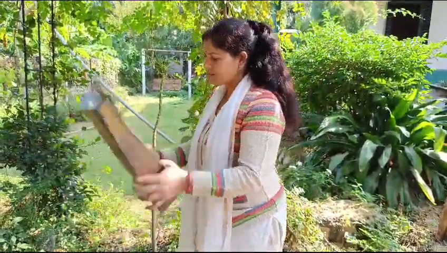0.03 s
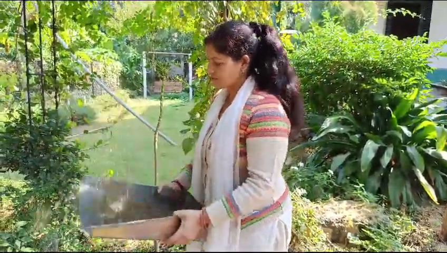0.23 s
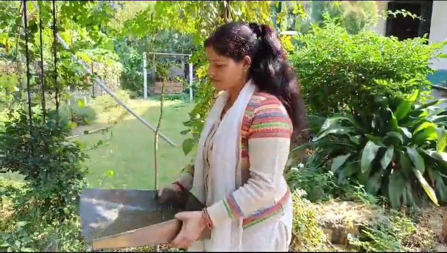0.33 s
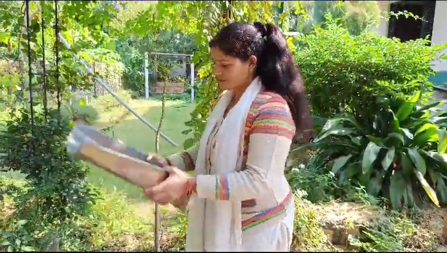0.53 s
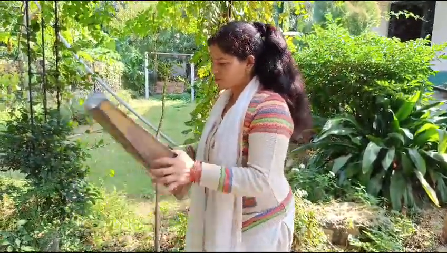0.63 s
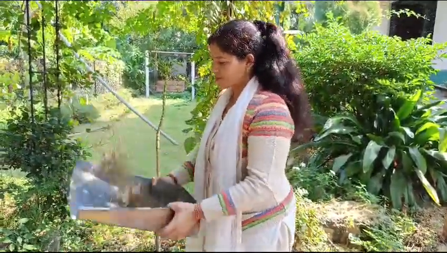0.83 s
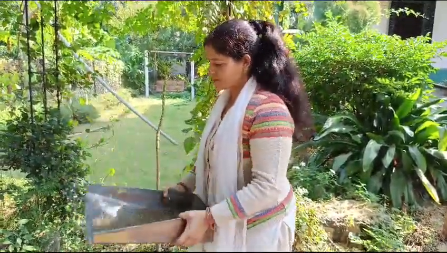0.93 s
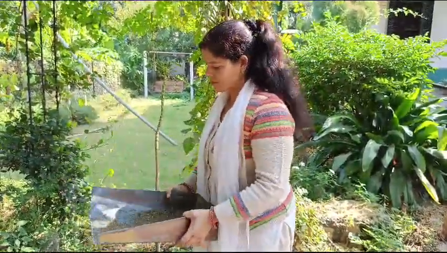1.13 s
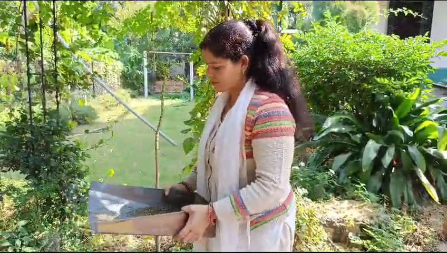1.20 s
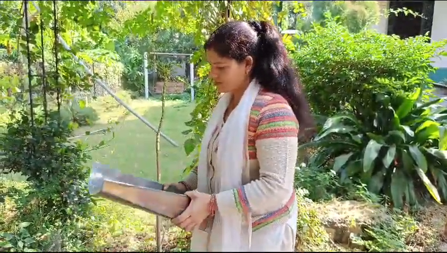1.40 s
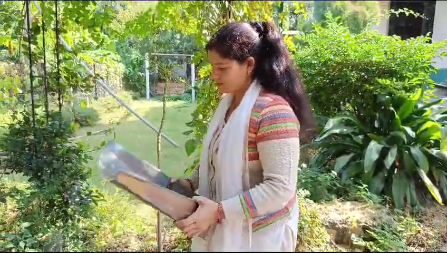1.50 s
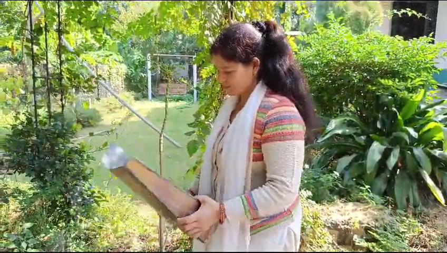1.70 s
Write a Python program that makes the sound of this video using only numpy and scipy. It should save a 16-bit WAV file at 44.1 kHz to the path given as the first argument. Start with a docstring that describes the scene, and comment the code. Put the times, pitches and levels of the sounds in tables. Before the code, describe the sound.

Two tosses of grain thump and shower onto a sheet-metal tray in a quiet garden.

```python
"""Grain is winnowed on a sheet-metal tray, tossed twice in a quiet garden.
Each time the bulk of the grain thumps the tray and sets it ringing, then the rest showers down in a swish.
Between tosses the grain slides softly and single kernels tick.
Behind it sit a low outdoor rumble and hum, a faint thin tone and a few far chirps."""
import sys
import numpy as np
from scipy import signal
from scipy.fft import rfft, irfft
from scipy.io import wavfile
from scipy.ndimage import uniform_filter1d

SR = 44100
rng = np.random.default_rng(int(sys.argv[2]) if len(sys.argv) > 2 else 0)


def master_out(mix):
    """Clip the mix to full scale and print it as 16-bit PCM to the path in sys.argv[1]."""
    frames = np.transpose(np.atleast_2d(mix))
    ceiling = np.clip(frames, -1, 1)
    pcm = np.round(ceiling * 32767).astype(np.int16)
    wavfile.write(sys.argv[1], SR, pcm)


N = 77175

# The tray's modes. Each row: pitch in Hz, dB when hit at the back, dB when hit mid-tray, t60 in seconds.
TRAY_MODES = [(222, -44, -43, .3), (251, -34.5, -25, .38), (360, -26.5, -30, .4), (381, -27.5, -44, .32),
              (418, -30, -37.5, .6), (484, -24.5, -38, .32), (515, -29.5, -41, .85), (535, -33, -42, .5),
              (554, -37, -30, .35), (576, -37, -37.5, .5), (662, -52, -38, .27), (714, -39, -34, .28),
              (748, -48, -38, .29), (787, -45, -24.5, .22), (845, -41, -29, .22), (898, -42, -28.5, .7),
              (934, -43, -38, .3), (981, -40, -27, .23), (1060, -21, -25.5, .23), (1105, -33, -33, .2),
              (1170, -39, -40, .22), (1522, -55, -36, .2), (2092, -38, -40, .16), (2280, -45, -43, .17)]
# The sheet's dense, short rattle. Each row: frequency in Hz, level in dB.
CLATTER_COLOUR = [(60, -28), (150, -14), (235, 4.5), (295, -8.5), (370, -4.5), (510, 6.5), (620, -19.5),
                  (800, -1), (1100, 6), (1320, -10), (1600, -2.5), (1830, -12.5), (2130, -5), (2700, -22),
                  (3700, -24), (4600, -38), (7000, -29), (16000, -105)]
# The bulk lands. Each row: start in seconds, ring in dB, place (0 back, 1 middle), attack in seconds,
# clatter in dB, push in dB, seconds until the piled grain chokes the ring.
LANDING_HITS = [(0.2066, -1, 0, 0.0039, -27.5, -54, 0.16), (.886, 0.5, 0.99, 0.0024, -25, -31, 0.12)]


def thump(start, ring_db, place, attack_s, clatter_db, push_db, choke_s):
    """The bulk lands: a dull push, a short clatter of the sheet, and modes that ring by where it falls."""
    push_hz, push_s = 242.4, 0.024
    hold_s, drop_s, tail_db, tail_t60 = 0.0087, 0.0035, -1.5, 0.31
    t = since(start)
    ring = sum(amp(back + (middle - back) * place - 60 * t / t60)
               * np.sin(2 * np.pi * (hz * t + rng.random())) for hz, back, middle, t60 in TRAY_MODES)
    choke = np.exp(-(t / choke_s) ** 7.4)  # piled grain stops the ring abruptly
    crash = np.exp(-np.maximum(t - attack_s - hold_s, 0) / drop_s)
    tail = amp(tail_db - 60 * t / tail_t60)
    clatter = amp(clatter_db) * np.maximum(crash, tail) * noise(eq(CLATTER_COLOUR))
    push = amp(push_db) * arch(t, push_s) * np.sin(2 * np.pi * push_hz * t)
    return np.minimum(t / attack_s, 1) * (amp(ring_db) * ring * choke + clatter) + push


# Small clumps around each landing. Each row: start in seconds, level in dB, rattle centre in Hz.
CLUMP_HITS = [(0.197, -39.5, 790), (0.2157, -23, 473), (0.855, -30, 1270), (0.868, -28, 1230),
              (.878, -29, 406), (0.908, -26.5, 1080), (1.010, -35.5, 440)]


def clump(start, db, hz, attack_s=0.004, t60=0.067):
    """A light clump rattles the sheet, higher or lower by where it falls."""
    t = since(start)
    rattle = noise(eq(CLATTER_COLOUR) * band(hz, octaves=0.88))
    return np.minimum(t / attack_s, 1) * amp(db - 60 * t / t60) * rattle


# One swish per toss. Each row: time in seconds, level in dB, treble lift in dB.
SHOWER_CURVES = [
    [(.22, -66, -16), (.246, -60.5, -18), (.27, -51, -0.5), (.31, -43, -2), (.39, -42.5, -1), (.45, -44, 2),
     (.5, -48, -2.5), (.56, -59, 2.5), (.63, -76, 6)],
    [(.9, -49.5, -33), (.93, -52, -2.5), (.965, -48.5, -1), (.995, -42.5, -4), (1.04, -46.5, -1),
     (1.105, -44, 2.5), (1.135, -46, 0), (1.165, -55.5, 2), (1.22, -66, 5), (1.3, -84.5, 9)],
]
# The tone of raining grain. Each row: frequency in Hz, level in dB.
SWISH_COLOUR = [(180, -28), (330, -39), (400, -19), (520, -2), (650, -15), (800, -7.5), (1020, -2.5),
                (1180, -2.5), (1300, -8), (1550, -4.5), (2050, -4.5), (2400, -7), (2590, -10.5), (2820, -9),
                (3920, -6), (4550, -10), (5300, -8), (7300, -10), (8200, -16), (10300, -13), (15800, -14.5)]
# Ringing under the rain. Each row: pitch in Hz, width in Hz, dB in the first toss, dB in the second.
SHOWER_RESONANCES = [(885, 9.8, -12, -12), (1013, 44, -11, -20), (1750, 9.4, -21.5, -25),
                     (1905, 6.9, -6, -5), (2036, 32, -10, -11.5), (2322, 67, -10.5, -14),
                     (2787, 72, -15.5, -12.5)]


def shower(curve, toss):
    """Kernels rain on the tray, brighter as grain lands on grain, and keep a few resonances singing."""
    times, db, lift_db = np.transpose(curve)
    hits = kernels(per_s=12000, spread_db=2.5)
    hiss = amp(7.5) * coloured(hits, eq(SWISH_COLOUR))
    body = lowpass(hiss, hz=7040)
    treble = (hiss - body) * amp(np.interp(since(0), times, lift_db))
    rings = sum(amp(ring_db[toss]) * coloured(hits, resonance(hz, width))
                for hz, width, *ring_db in SHOWER_RESONANCES)
    return (body + treble + rings) * fader(np.transpose([times, db]))


# Three slides as the tray swings. Each row: time in seconds, level in dB.
SLIDE_CURVES = [
    [(0.0, -64), (0.026, -74), (0.082, -58.5), (0.13, -62), (0.22, -58.5), (0.246, -80), (0.26, -49)],
    [(0.62, -64), (0.656, -75), (0.7, -59.5), (0.746, -53.5), (0.804, -60.5), (0.872, -58), (0.92, -76)],
    [(1.3, -88), (1.364, -65), (1.376, -56.5), (1.54, -62), (1.6, -57.5), (1.704, -64.5), (1.75, -61.5)],
]
# The fizz of sliding grain. Each row: frequency in Hz, level in dB.
FIZZ_COLOUR = [(880, -56), (1500, 2), (1720, -28.5), (1810, -23), (2550, -19), (3640, -2.5), (4480, 0.5),
               (7040, 4.5), (8490, -4), (15800, 1.5)]


def slide(skid_s=0.024, skid_db=2):
    """Kernels move over the swinging tray in small uneven skids, making a fine fizz."""
    fizz = amp(1.06) * coloured(kernels(per_s=2200, spread_db=3), eq(FIZZ_COLOUR))
    window = round(skid_s * SR)
    drift = uniform_filter1d(uniform_filter1d(rng.standard_normal(N), window), window)
    skids = amp(skid_db * unit(drift))
    return fizz * skids * sum(fader(curve) for curve in SLIDE_CURVES)


# The rustle's rise and fall. Each row: time in seconds, level in dB.
RUSTLE_CURVE = [(0, -65), (.11, -61), (.16, -55), (.22, -50.5), (.6, -62), (.79, -59), (.85, -48.5),
                (1.18, -55.5), (1.3, -67.5), (1.55, -62.5), (1.65, -59.5), (1.75, -58.5)]
# Its dull tone. Each row: frequency in Hz, level in dB.
RUSTLE_EQ = [(150, 0), (480, 4.5), (700, -1), (1000, 0.5), (1350, -1), (2000, -3), (2700, -8), (5000, -15)]
# The sheet's faint song. Each row: pitch in Hz, width in Hz, level in dB.
SHEET_RESONANCES = [(2023, 99, -13)]


def rustle():
    """The moving tray rustles, and the sheet sings faintly under the sliding grain."""
    rub = noise(eq(RUSTLE_EQ))
    rings = sum(amp(db) * noise(resonance(hz, width)) for hz, width, db in SHEET_RESONANCES)
    return (rub + rings) * fader(RUSTLE_CURVE)


# Single kernels. Each row: start in seconds, level in dB, pitch in Hz, t60 in seconds.
KERNEL_TICKS = [(0.715, -47.5, 9500, 0.01), (0.727, -50, 7000, .01), (0.866, -44, 7000, 0.016),
                (1.337, -57.5, 6700, 0.011), (1.3782, -48, 7700, 0.011), (1.4554, -49, 5600, 0.026),
                (1.458, -51, 2200, 0.022), (1.4597, -46.5, 4300, 0.018), (1.534, -55, 15000, 0.009),
                (1.558, -48, 8900, 0.015), (1.583, -52, 11500, 0.01), (1.658, -51, 7000, 0.009)]


def tick(start, db, hz, t60):
    """One stray kernel strikes: a tiny burst of pitched noise."""
    t = since(start)
    return (t > 0) * amp(db - 60 * t / t60) * noise(band(hz, octaves=0.38))


# The tray's stereo balance. Each row: frequency in Hz, left minus right in dB.
TRAY_BALANCE = [(60, 1.5), (500, -2.5), (860, 2), (1200, -3.5), (1580, 5), (2080, -9.5), (2750, 2),
                (3300, -6.5), (4500, -2.5), (7500, 2), (12500, -7.5), (16000, -14)]
# Its earlier arrival on the left. Each row: frequency in Hz, phase lead in radians.
LEFT_LEAD = [(20, -1), (550, 0.24), (1050, 1.5), (1400, 2.5), (1800, 1.5), (2200, 5.5), (2750, 5.5),
             (3600, 10), (16000, 48.5)]


def place_tray(x):
    """The tray lies to the left, so each side hears it with a different delay and colour."""
    half = amp(across_bins(TRAY_BALANCE) / 2)
    pair = np.array([half, np.exp(-1j * across_bins(LEFT_LEAD)) / half])
    pair_rms = np.sqrt(np.mean(abs(pair) ** 2, axis=0))
    return irfft(rfft(x) * pair / pair_rms, N)


# The outdoor bed. Each row: frequency in Hz, level in dB.
AIR_COLOUR = [(20, -9), (40, -5.5), (58, 1), (85, -11), (125, -14.5), (200, -17), (450, -27), (800, -30.5),
              (1500, -51), (3500, -41), (8000, -44), (16000, -57)]
# The rumble's swell. Each row: time in seconds, gain in dB.
RUMBLE_SWELL = [(0, -4.5), (.25, -2.5), (.41, 7), (.6, 0), (.73, 2.5), (1.0, 0.5), (1.15, 3.5), (1.33, -4),
                (1.55, -1), (1.68, 3.5)]


def garden_air():
    """Soft outdoor air with a wavering low hum; the low end swells and sinks."""
    hum = amp(-55.5) * noise(resonance(hz=58.7, width=19))
    air = amp(-52.5) * noise(eq(AIR_COLOUR)) + hum
    rumble = lowpass(air, hz=138)
    swell = amp(np.interp(since(0), *np.transpose(RUMBLE_SWELL)))
    return air - rumble + rumble * swell


# Chirps far off in the garden. Each row: start in seconds, length in seconds, pitch in Hz, level in dB.
FAR_CHIRPS = [(1.557, 0.0075, 3650, -57), (1.588, 0.009, 3640, -61), (1.603, .022, 3600, -67),
              (1.715, 0.033, 3280, -65)]
# A thin tone between the tosses. Each row: time in seconds, level in dB.
THIN_TONE_CURVE = [(.57, -79), (.62, -63.5), (.69, -78), (.745, -64), (.82, -72)]


def faint_tones():
    """A few tiny far chirps and one thin tone, all wavering in pitch."""
    chirps = sum(amp(db) * arch(since(start), length) * whistle(hz, waver=0.025)
                 for start, length, hz, db in FAR_CHIRPS)
    return chirps + fader(THIN_TONE_CURVE) * whistle(hz=1690, waver=0.0044)


# The stereo width of every noise. Each row: frequency in Hz, left-right likeness from 0 to 1.
STEREO_LIKENESS = [(25, 0.73), (60, 0.87), (120, 0.6), (400, 0.59), (700, 0.54), (1100, 0.71), (2200, 0.16),
                   (3500, 0.18), (8000, 0.034), (16000, 0.69)]


def coloured(pair, gain):
    """Two unrelated signals, filtered and made partly alike, at rms 1."""
    left, other = rfft(pair)
    same = across_bins(STEREO_LIKENESS)
    right = same * left + np.sqrt(1 - same ** 2) * other
    return unit(irfft(np.array([left, right]) * gain, N))


def noise(gain):
    """Stereo noise with the given spectrum."""
    return coloured(rng.standard_normal((2, N)), gain)


def kernels(per_s, spread_db):
    """Random tiny impacts of uneven size."""
    size = amp(spread_db * np.minimum(rng.exponential(1, (2, N)), 5))
    return size * rng.choice([-1, 1], (2, N)) * (rng.random((2, N)) < per_s / SR)


def whistle(hz, waver):
    """A sine whose pitch wavers by the given share."""
    drift = unit(lowpass(rng.standard_normal(N), hz=50))
    return np.sin(2 * np.pi * np.cumsum(hz * (1 + waver * drift)) / SR)


def since(start):
    """Seconds since start, zero before."""
    return np.maximum(np.arange(N) / SR - start, 0)


def arch(t, length):
    """A half-sine swell."""
    return np.sin(np.pi * np.minimum(t / length, 1))


def fader(points):
    """Gain along a (seconds, dB) curve, dying quickly outside it."""
    times, db = np.transpose(points)
    t = since(0)
    outside_s = abs(t - np.clip(t, times[0], times[-1]))
    return amp(np.interp(t, times, db) - 600 * outside_s)


def bins():
    """Frequencies of the whole-length spectrum."""
    return np.fft.rfftfreq(N, 1 / SR)


def across_bins(points):
    """Spreads a (Hz, value) curve over the spectrum on a log-frequency axis."""
    hz, value = np.transpose(points)
    return np.interp(np.log(bins() + 1), np.log(hz + 1), value)


def eq(points):
    """Gain along a (Hz, dB) curve."""
    return amp(across_bins(points))


def resonance(hz, width):
    """Gain of one resonance with steep skirts."""
    return 1 / (1 + (2 * (bins() - hz) / width) ** 2)


def band(hz, octaves):
    """Gain of a soft band around hz."""
    return np.exp(-.5 * (np.log2((bins() + 1) / hz) / octaves) ** 2)


def lowpass(x, hz):
    """The part of x under hz."""
    return irfft(rfft(x) / (1 + (bins() / hz) ** 6), N)


def amp(db):
    """Decibels to gain."""
    return 10 ** (np.asarray(db) / 20)


def unit(x):
    """Scales to rms 1."""
    return x / np.sqrt(np.mean(x ** 2) + 1e-20)


def scene():
    """The tray and its grain up front, the garden behind."""
    thumps = sum(thump(*row) for row in LANDING_HITS)
    clumps = sum(clump(*row) for row in CLUMP_HITS)
    showers = sum(shower(curve, toss) for toss, curve in enumerate(SHOWER_CURVES))
    sliding = slide() + rustle()
    ticks = sum(tick(*row) for row in KERNEL_TICKS)
    return place_tray(thumps + clumps + showers + sliding + ticks) + garden_air() + faint_tones()


def record(dry, top_hz=15900):
    """A steep low-pass trims the very top of the mix."""
    taps = signal.firwin(511, top_hz, window=("kaiser", 9), fs=SR)
    return signal.oaconvolve(dry, taps[None], "same")


dry = scene()
out = record(dry)
master_out(out)
```